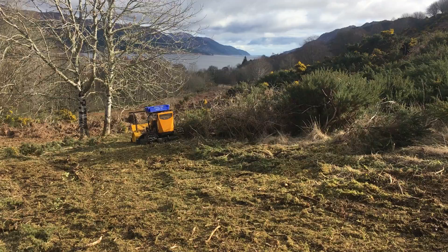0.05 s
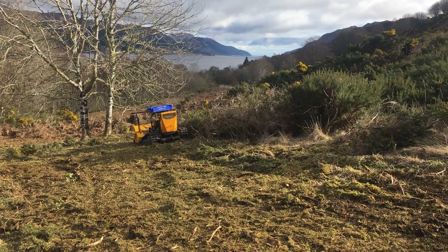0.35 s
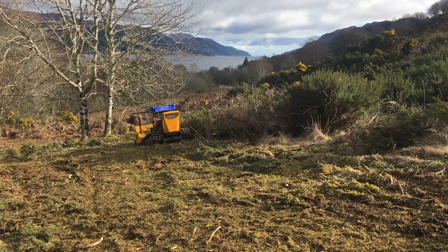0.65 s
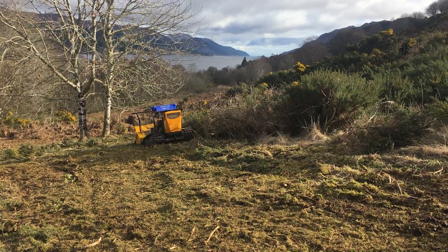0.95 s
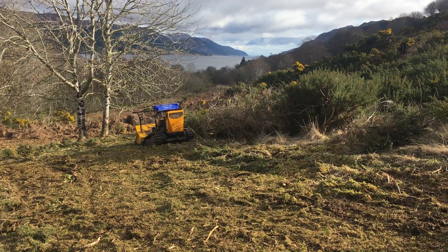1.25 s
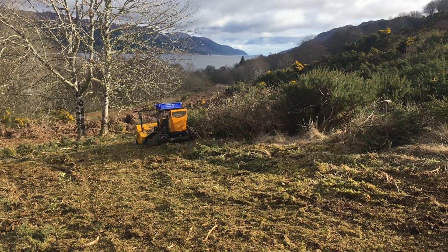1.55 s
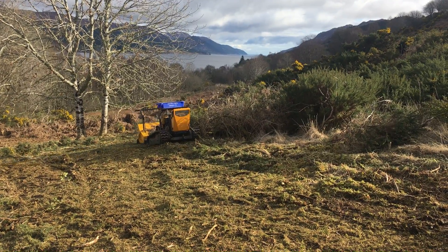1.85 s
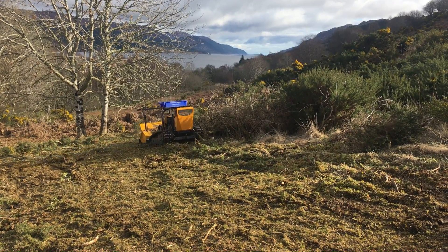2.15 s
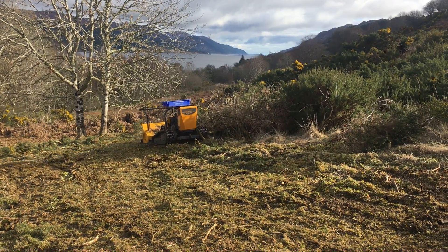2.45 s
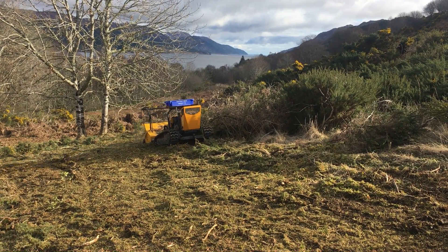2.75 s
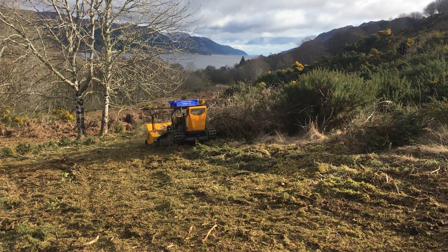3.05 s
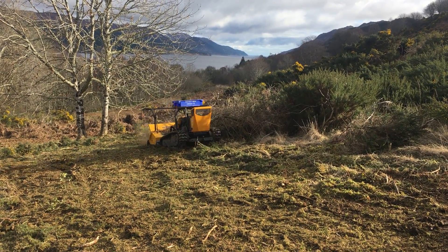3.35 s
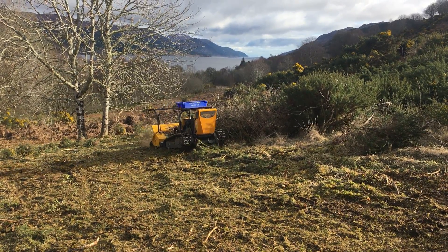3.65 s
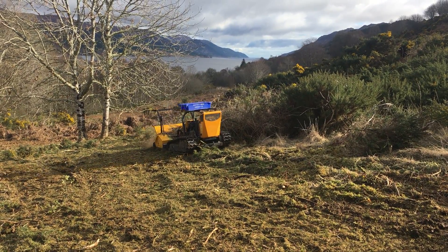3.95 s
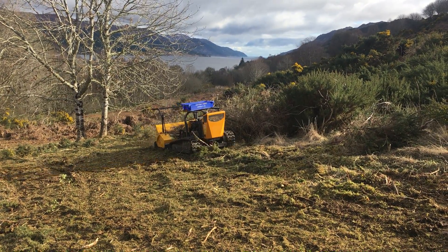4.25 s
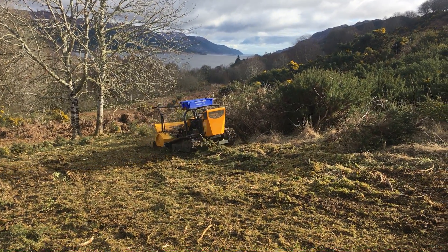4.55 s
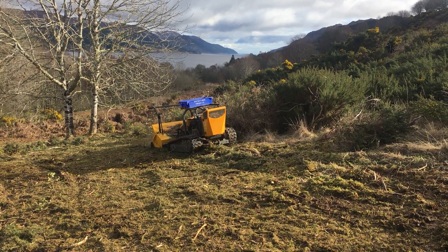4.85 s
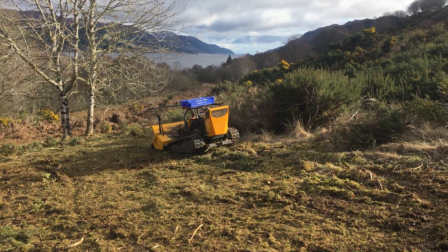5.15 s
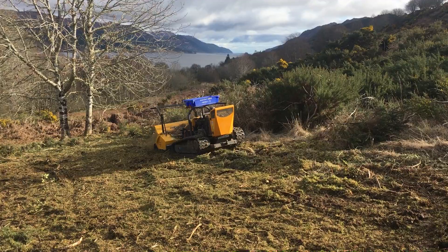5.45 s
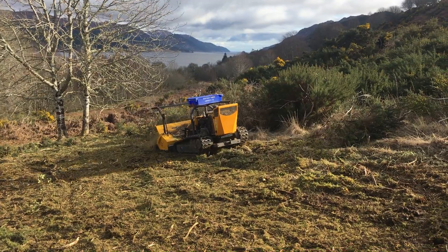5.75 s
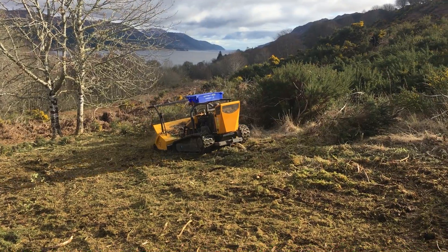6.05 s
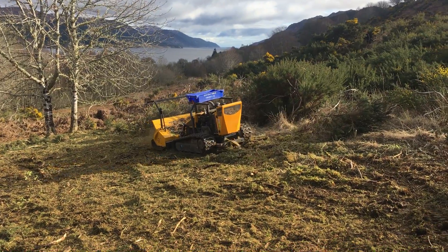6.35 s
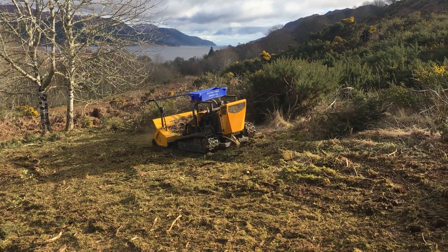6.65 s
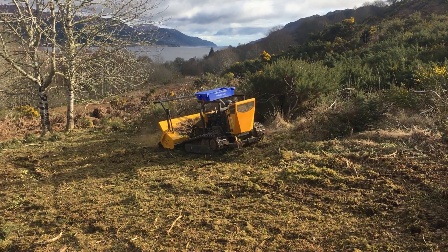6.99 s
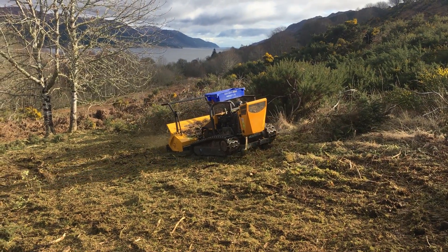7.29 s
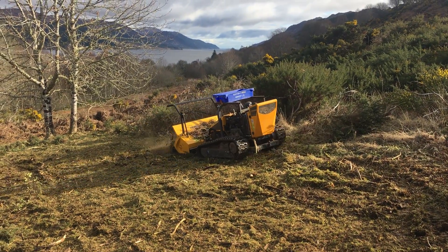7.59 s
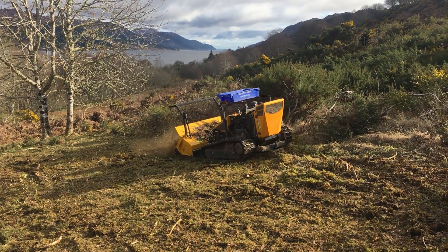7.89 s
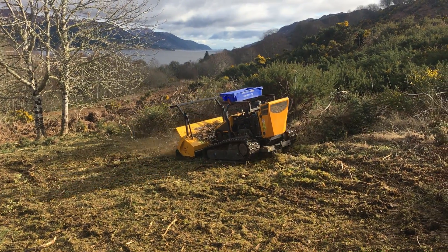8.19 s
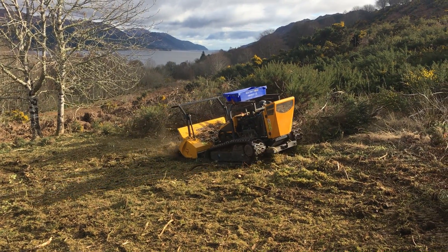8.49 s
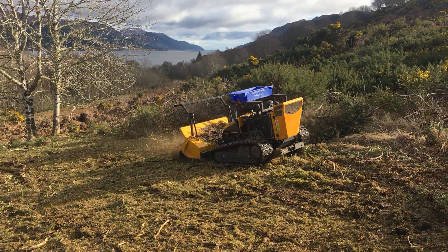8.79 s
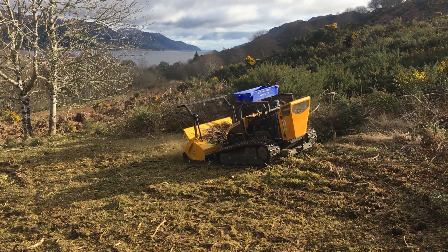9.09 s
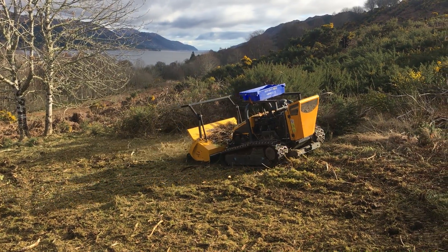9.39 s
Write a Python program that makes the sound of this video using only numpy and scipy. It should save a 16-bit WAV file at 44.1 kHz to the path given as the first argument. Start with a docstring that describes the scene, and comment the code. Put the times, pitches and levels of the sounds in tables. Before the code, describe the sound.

Brush crackles and sticks snap in a mulching machine, over a steady high-revving diesel that sags slightly near the end.

```python
"""A small tracked mulcher works an open hillside, crawling closer to one fixed microphone. Its
three-cylinder diesel drones and knocks at high revs and sags under load near the end; steel panels
ring and a fan whines beside it. The spinning head hums and shreds one swathe of brush after another,
branches splinter in bursts of clicks, dry sticks snap, and a light breeze buffets the microphone."""
import sys
import numpy as np
from scipy import signal
from scipy.fft import rfft, irfft
from scipy.io import wavfile
from scipy.ndimage import uniform_filter1d

SR = 44100
rng = np.random.default_rng(int(sys.argv[2]) if len(sys.argv) > 2 else 0)


def wav_record(signal):
    """Record a signal, one row per channel, as 16-bit PCM in the file named by sys.argv[1]."""
    frames = np.transpose(np.atleast_2d(signal))
    bounded = np.clip(frames, -1, 1)
    # unit amplitude maps onto the largest positive 16-bit level
    quanta = np.round(bounded * 32767).astype(np.int16)
    wavfile.write(sys.argv[1], SR, quanta)


N = 420273
TIME = np.arange(N) / SR

# Engine speed. Each row: time in seconds, firing rate in Hz.
FIRING_RATE = [(0.0, 76.84), (1.2, 77.7), (2.4, 77.15), (3.6, 75.97), (4.3, 77.17), (5.1, 77.47),
               (6.25, 75.77), (6.65, 77.1), (7.05, 77.06), (7.6, 73.86), (8.1, 70.34), (8.5, 70.16),
               (8.82, 69.46), (9.53, 70.15)]
# The low voice of the hood over the cutting head. Each row: frequency in Hz, relative level in dB.
HOOD_SPECTRUM = [(25, -31), (60, -15), (100, 0.5), (130, -2), (190, 3.5), (290, -2.5), (350, -14),
                 (500, -25.5), (1000, -57)]


def undb(db):
    """Decibels to gain."""
    return 10 ** (np.asarray(db) / 20)


def unit(x):
    """Scale to rms 1."""
    return x / np.sqrt(np.mean(x ** 2) + 1e-18)


def curve(table):
    """Rows of (seconds, value), joined by straight lines."""
    return np.interp(TIME, *np.transpose(table))


def colour(x, spectrum):
    """Minimum-phase filter through rows of (Hz, dB); rms 1."""
    hz, db = np.transpose(spectrum)
    size = 4096
    bin_hz = np.arange(size // 2 + 1) * SR / size
    log_gain = np.interp(np.log(bin_hz + 1), np.log(hz), np.log(undb(db)))
    cepstrum = irfft(log_gain)
    cepstrum[1:size // 2] *= 2
    cepstrum[size // 2 + 1:] = 0
    impulse = irfft(np.exp(rfft(cepstrum)))
    return unit(signal.oaconvolve(x, impulse)[:len(x)])


def noise(spectrum, size=N):
    """Coloured noise; rms 1."""
    return colour(rng.standard_normal(size), spectrum)


def resonance(x, hz, width_hz):
    """One band-pass resonance; rms 1."""
    return unit(signal.lfilter(*signal.iirpeak(hz, hz / width_hz, fs=SR), x))


def drift(per_s):
    """A wavering line through per_s random values a second; rms 1."""
    step = int(SR / per_s)
    held = np.repeat(rng.standard_normal(N // step + 1), step)
    return unit(uniform_filter1d(held, step)[:N])


def grains(size, per_s, spread_db, decay_s):
    """Tiny bursts at random moments, many weak and a few strong; rms 1."""
    hits = rng.random(size) < per_s / SR
    strength = undb(spread_db * np.minimum(rng.exponential(size=size), 4))
    energy = signal.lfilter([1], [1, -np.exp(-2 / (decay_s * SR))], hits * strength ** 2)
    return unit(np.sqrt(energy) * rng.standard_normal(size))


def add(out, start_s, x):
    """Mix x into out from start_s on."""
    i = max(int(start_s * SR), 0)
    out[i:i + len(x)] += x[:N - i]


def scatter(x, decay_s, wet_db):
    """Ground, hood and bushes return a short diffuse tail to the microphone."""
    t = TIME[:SR // 3]
    tail = rng.standard_normal(len(t)) * np.exp(-t / decay_s)
    return x + undb(wet_db) * signal.oaconvolve(x, tail / np.linalg.norm(tail))[:N]


def approach():
    """Nearness in dB as the machine swings round and crawls closer; each source scales it its own way."""
    # Each row: time in seconds, level in dB against the closest position.
    path = [(0, -4), (1.4, -4.5), (2.4, -3.5), (4.2, -2), (5.3, -2), (6.2, -0.85), (7.3, 0), (9.53, 0)]
    return curve(path)


def sag(free_hz=77.6):
    """Load on the engine: Hz lost from the free-running firing rate."""
    return np.maximum(free_hz - curve(FIRING_RATE), 0)


def roar(near_db=-28.0, turned_away_db=-3, turn_s=2.1):
    """Base level of the machine noise in dB: it grows as it turns to face the microphone and nears."""
    return near_db + 0.4 * approach() + turned_away_db * np.maximum(1 - TIME / turn_s, 0)


def cutting(entry_s=0.81, bite_s=0.15):
    """0 while the head runs free, 1 once it is in the brush."""
    return 0.5 + 0.5 * np.tanh((TIME - entry_s) / bite_s)


def exhaust(firings, waver_db):
    """The muffler leaves a clean drone of four harmonics; they grow with nearness and shift with load."""
    # Each row: multiple of the firing rate, level in dB when near, dB per dB of approach, dB per Hz of sag.
    harmonics = [(1, -32.5, 3.5, .5), (2, -20, 1.0, 0), (3, -29, 2, -0.07), (4, -40, 3.5, 0.14)]
    near, load, drone = approach(), sag(), np.zeros(N)
    for multiple, db, per_near, per_load in harmonics:
        gain = undb(db + per_near * near + per_load * load + waver_db * drift(18))
        drone += gain * unit(np.cos(2 * np.pi * round(multiple) * firings))
    return drone


def rotor(firings, drive_ratio, hum_db):
    """The unbalanced cutting drum hums just above the firing rate and beats slowly against it."""
    hum = unit(np.sin(2 * np.pi * drive_ratio * firings))
    return undb(hum_db + 0.65 * approach() + 2 * drift(3.04)) * hum


def diesel(firings, clatter_db, hiss_db, repeat_db, tones_db, knock_free, knock_cutting, knock_width):
    """The block clatters and hisses once a firing; while the head is in the brush the firing pulses are
    shallower."""
    # Clatter and hiss of the block. Each row: frequency in Hz, relative level in dB.
    clatter_spectrum = [(250, -26.5), (380, -20.5), (480, -8.5), (600, 1.5), (880, 0), (1100, -2),
                        (1400, -4), (1550, -10), (1850, -7.5), (2900, -16.5), (3400, -10), (5000, -28.5),
                        (9000, -31), (16000, -35)]
    hiss_spectrum = [(1500, -20.5), (3400, 1.5), (4400, -0.5), (4950, -6), (5600, -7), (6500, -3.5),
                     (7600, -8), (8500, -4.5), (9900, -9.5), (10400, -17), (11300, -9), (13500, -21),
                     (16000, -26)]
    # Weaker engine and pump tones. Each row: multiple of the firing rate, relative level in dB.
    engine_tones = [(4 / 3, -10.5), (8 / 3, -10.5), (6, -16.5), (9, -12), (11, -12)]
    depth = knock_free + (knock_cutting - knock_free) * cutting()
    pulse = np.exp((np.cos(2 * np.pi * firings) - 1) / knock_width)
    pulse = unit(pulse - pulse.mean())
    # Valves and injectors strike in the same order on every cycle of three firings.
    cycle = rng.standard_normal(SR // 26)
    repeating = cycle[(firings / 3 % 1 * len(cycle)).astype(int)]
    rattle = rng.standard_normal(N) + undb(repeat_db) * repeating
    knocks = rattle * np.exp(0.45 * depth * pulse)
    clatter = colour(knocks, clatter_spectrum) * undb(clatter_db + 0.45 * drift(12))
    tones = np.zeros(N)
    for multiple, db in engine_tones:
        turns = round(3 * multiple) / 3 * firings
        tones += undb(db + 2.4 * drift(5)) * unit(np.sin(2 * np.pi * (turns + rng.random())))
    hiss = colour(rng.standard_normal(N) * np.exp(depth * (pulse - depth)), hiss_spectrum)
    hiss *= undb(hiss_db + 2.4 * drift(4.8))
    return undb(roar()) * (clatter + undb(tones_db) * tones) + hiss


def panels(ring_db):
    """Constant shaking keeps the steel panels ringing, each swelling on its own."""
    # Panel resonances. Each row: frequency in Hz, width in Hz, relative level in dB.
    modes = [(1240, 35, -5.5), (1405, 28, -9), (1557, 26, -3), (1696, 35, -3), (1863, 48, -5.5),
             (2290, 110, -3), (3290, 300, -0.5)]
    rings = sum(undb(db + 2 * drift(10)) * resonance(rng.standard_normal(N), hz, width_hz)
                for hz, width_hz, db in modes)
    return rings * undb(roar() + ring_db)


def fan(fan_db, load_db_per_hz, flutter_db):
    """Blade tones on their own drive, fluttering in the moving air; they weaken as the engine labours."""
    # Fan speed. Each row: time in seconds, blade rate in Hz.
    blade_rate = [(0, 272), (1.3, 275.3), (7.4, 276.2), (8.0, 271.5), (9.53, 266.6)]
    # Each row: multiple of the blade rate, relative level in dB.
    blade_tones = [(1, -3.5), (2, -1), (3, -1.5)]
    level_db = fan_db + 1.7 * approach() + load_db_per_hz * sag()
    passes = np.cumsum(curve(blade_rate) * (1 + 0.00094 * drift(14))) / SR
    return sum(undb(level_db + db + flutter_db * drift(6)) * unit(np.sin(2 * np.pi * round(k) * passes))
               for k, db in blade_tones)


def feed(attack_s=0.023, release_s=0.056):
    """Rise of the shredding and its sizzle in dB as each swathe is drawn in, chewed and cleared."""
    # Each row: start in seconds, length in seconds, rise in dB, extra sizzle of dry needles in dB.
    swathes = [(1.09, 0.23, 3, 3), (1.479, .12, 2.5, 1), (1.87, .28, 5.5, 1.5), (2.17, 0.11, 6, -4.5),
               (2.35, 0.12, 5, 2), (2.656, .15, 4.5, 2), (3.0, .18, 4.5, -1), (3.36, .25, 2.5, 1),
               (3.699, 0.27, -1, 3.5), (4.1, 0.13, 2.5, -1.5), (4.65, 0.31, 4, 2), (5.139, 0.38, 4, -0.5),
               (5.679, 0.27, 1, -2.5), (7.101, 0.21, 3.5, 0), (7.3, .5, 5.5, -1), (7.921, 0.49, 2.5, -0.5),
               (8.42, 0.19, 8, -4), (8.598, .1, 6, -0.5), (8.72, 0.18, 2.5, -1), (9.0, .32, 1.5, 0.5),
               (9.481, .1, 4.5, -1)]
    rise, sizzle, t = np.zeros(N), np.zeros(N), TIME[:SR]
    for start_s, length_s, rise_db, sizzle_db in swathes:
        chewing = (1 - np.exp(-t / attack_s)) * np.exp(-np.maximum(t - length_s, 0) / release_s)
        add(rise, start_s, rise_db * chewing)
        add(sizzle, start_s, sizzle_db * chewing)
    return rise, sizzle


def cutting_head(shred_db, surge_db, sizzle_hz, chips_db, free_chips_db, shell_db, rumble_db):
    """Brush is torn into an uneven crackle; chips rattle the hood, which rumbles and rings."""
    # Torn fibres, flying chips and the steel shell. Each row: frequency in Hz, relative level in dB.
    fibre_spectrum = [(300, -10.5), (700, -0.5), (1300, 2.5), (2300, 4), (2900, 0.5), (3400, -1),
                      (4400, -6), (4950, -6), (5700, -0.5), (7500, -11), (9000, -11.5), (12000, -23),
                      (16000, -25)]
    chip_spectrum = [(600, -19), (1500, -9), (2300, 1), (3400, 4), (4400, 2.5), (5000, -4), (6200, -4),
                     (8000, -15), (16000, -36)]
    shell_spectrum = [(300, -29.5), (550, -15), (720, -8), (840, -2.5), (1000, -4.5), (1300, -14.5),
                      (3000, -25.5), (8000, -56)]
    feed_db, sizzle_db = feed()
    tearing = grains(N, per_s=2200, spread_db=3.5, decay_s=0.0028)
    fibres = colour(tearing, fibre_spectrum) * undb(shred_db + surge_db * drift(35))
    needles = signal.sosfiltfilt(signal.butter(2, sizzle_hz, "high", fs=SR, output="sos"), fibres)
    fibres += needles * (undb(sizzle_db) - 1)
    impacts = grains(N, per_s=70, spread_db=2.8, decay_s=0.0081)
    chips = colour(impacts, chip_spectrum) * undb(chips_db + free_chips_db * (1 - cutting()))
    # Shell and hood sound out more as the machine nears and labours.
    shell = noise(shell_spectrum) * undb(roar() + shell_db + 0.69 * sag() + drift(20))
    hood_db = roar() + rumble_db + 0.4 * sag() + 0.5 * feed_db
    rumble = noise(HOOD_SPECTRUM) * undb(hood_db + 2.2 * drift(14))
    return (fibres + chips) * undb(feed_db) + shell + rumble


def breeze(wind_db, buffet_db):
    """Soft low buffets right on the microphone, stronger in each puff."""
    # Wind rumble. Each row: frequency in Hz, relative level in dB.
    wind_spectrum = [(20, -18), (35, -4), (52, 7), (80, -3), (130, -10), (400, -35)]
    # Each row: time of the crest in seconds, width in seconds, rise in dB.
    puffs = [(.8, 0.55, 9), (2.6, 0.069, 11)]
    puff_db = sum(db * np.exp(-((TIME - crest_s) / width_s) ** 2) for crest_s, width_s, db in puffs)
    return noise(wind_spectrum) * undb(wind_db + puff_db + buffet_db * drift(7))


def branches(crack_db, release_s, focus_db, thump_db):
    """A branch fails fibre by fibre in a burst of clicks; thick wood sounds lower and thumps the hood."""
    # Splintering wood. Each row: frequency in Hz, relative level in dB.
    wood_spectrum = [(150, -8), (380, -11), (700, 9.5), (1500, 3), (3500, -2.5), (4400, -2.5), (5000, -7),
                     (6000, -4), (8000, -11), (12000, -18), (16000, -42)]
    # Each row: start in seconds, length in seconds, relative level in dB, centre frequency in Hz.
    cracks = [(1.071, 0.008, -22.5, 2300), (1.088, 0.048, -23.5, 2500), (1.149, 0.016, -22.5, 2310),
              (1.999, 0.009, -25, 2000), (2.762, 0.009, -22, 3400), (3.038, 0.018, -20, 1800),
              (3.113, 0.044, -21, 1990), (3.378, 0.027, -22.5, 1690), (3.423, 0.073, -26.5, 1500),
              (3.559, 0.029, -24, 1300), (4.761, 0.012, -22, 3300), (5.146, 0.014, -21.5, 1500),
              (5.509, 0.014, -17.5, 2400), (5.608, 0.009, -21.5, 2670), (6.137, 0.007, -21.5, 2400),
              (6.357, 0.01, -25.5, 1390), (7.184, 0.0073, -22.5, 2600), (7.356, 0.012, -19.5, 3200),
              (7.372, 0.022, -16, 1900), (7.6, 0.021, -24, 2600), (7.658, 0.029, -16.5, 1900),
              (7.763, 0.023, -15.5, 1800), (7.801, 0.01, -21.5, 2010), (7.936, 0.013, -21.5, 2300),
              (7.982, 0.035, -25, 1700), (8.459, 0.062, -23.5, 1550), (8.601, 0.059, -19, 1780),
              (8.782, 0.011, -20, 1580), (9.05, 0.016, -21, 2200), (9.074, 0.015, -15, 1800),
              (9.12, 0.035, -25, 1800)]
    # Heavy pieces hitting the hood. Each row: start in seconds, relative level in dB.
    thumps = [(2.11, -29), (3.13, -27), (3.39, -24.5), (3.56, -25.5), (4.785, -22.5), (5.52, -24),
              (7.379, -26), (7.68, -27), (8.47, -27), (8.62, -26)]
    out, t = np.zeros(N), TIME[:SR // 4]
    hz, wood_db = np.transpose(wood_spectrum)
    for start_s, length_s, db, centre_hz in cracks:
        burst = grains(len(t), per_s=2500, spread_db=1.5, decay_s=0.0008)
        off_centre_db = focus_db * np.minimum(np.log2(hz / centre_hz) ** 2, 3)
        crack = colour(burst, np.column_stack([hz, wood_db - off_centre_db]))
        envelope = np.exp(-np.maximum(t - length_s, 0) / release_s)
        add(out, start_s, undb(db + crack_db) * crack * envelope)
    thump_envelope = np.exp(-t / 0.027) * (1 - np.exp(-t / 0.0022))
    for start_s, db in thumps:
        add(out, start_s, undb(db + thump_db) * noise(HOOD_SPECTRUM, len(t)) * thump_envelope)
    return scatter(out, decay_s=0.03, wet_db=-4.5)


def sticks(snap_db, tick_db, width_share, click_db, click_s):
    """Dry wood breaks with a click and rings briefly at its own pitch; thick sticks have little treble."""
    # Each row: start in seconds, relative level in dB, decay time in seconds, pitch in Hz.
    snaps = [(1.072, -14.5, 0.005, 3780), (1.092, -16, 0.005, 3600), (1.149, -15, 0.0062, 2070),
             (1.306, -23.5, 0.017, 6850), (2.767, -18.5, 0.007, 3600), (3.725, -17, .003, 3370),
             (3.898, -19, 0.0066, 3600), (3.952, -22.5, .005, 8000), (4.0305, -16, 0.002, 5500),
             (4.218, -25, 0.01, 7000), (4.754, -14, .005, 4200), (4.763, -10.5, 0.0048, 3500),
             (5.509, -15.5, .005, 2300), (5.610, -10.5, 0.008, 2700), (5.832, -22, .008, 5960),
             (6.136, -16, 0.0052, 4300), (6.475, -23.5, 0.014, 3400), (6.769, -24, 0.008, 5800),
             (7.669, -16, 0.008, 3900), (7.766, -17, .006, 2200), (8.15, -20, 0.0075, 3400),
             (8.178, -18, .008, 2400), (8.605, -19, 0.011, 3800), (8.64, -18, 0.014, 4220),
             (8.784, -21, .007, 1890), (9.075, -7, 0.0056, 2470)]
    out, t = np.zeros(N), TIME[:SR // 6]
    for start_s, db, decay_s, hz in snaps:
        tick = noise([(hz / 6, -14), (hz / 2, -2), (hz, 0), (hz * 2, -12), (hz * 4, -32)], len(t))
        body = resonance(tick, hz, hz * width_share)
        ring = unit(body + undb(tick_db) * tick) * np.exp(-t / decay_s)
        click = noise([(hz / 4, -6), (hz, 0), (hz * 2, -5), (hz * 4, -22)], len(t))
        click *= undb(click_db) * np.exp(-t / click_s)
        add(out, start_s, undb(db + snap_db) * (ring + click))
    return scatter(out, decay_s=0.027, wet_db=-5.5)


def scene():
    """The mulcher, the breaking wood and the breeze, in mono from one spot on the hillside."""
    firings = np.cumsum(curve(FIRING_RATE)) / SR  # running count of cylinder firings
    mix = exhaust(firings, waver_db=0.18)
    mix += rotor(firings, drive_ratio=1.031, hum_db=-44.5)
    mix += diesel(firings, clatter_db=-0.5, hiss_db=-40.5, repeat_db=-4, tones_db=-4.0,
                  knock_free=0.61, knock_cutting=0.24, knock_width=0.79)
    mix += panels(ring_db=-15.5)
    mix += fan(fan_db=-36.5, load_db_per_hz=-0.23, flutter_db=1.6)
    mix += cutting_head(shred_db=-35.5, surge_db=1.8, sizzle_hz=5000, chips_db=-39.5,
                        free_chips_db=-14, shell_db=-8.5, rumble_db=-7.5)
    mix += branches(crack_db=0.5, release_s=0.0082, focus_db=3.5, thump_db=4.0)
    mix += sticks(snap_db=-2.0, tick_db=4.5, width_share=0.19, click_db=-6.5, click_s=0.002)
    mix += breeze(wind_db=-50, buffet_db=1.8)
    return mix[None]


def record(dry):
    """The recorder rounds the loudest peaks and cuts the highest treble."""
    ceiling, top_hz = 0.72, 15600
    rounded = dry / (1 + (dry / ceiling) ** 4) ** (1 / 4)
    return signal.sosfilt(signal.ellip(10, 0.1, 80, top_hz, fs=SR, output="sos"), rounded)


dry = scene()
out = record(dry)
wav_record(out)
```